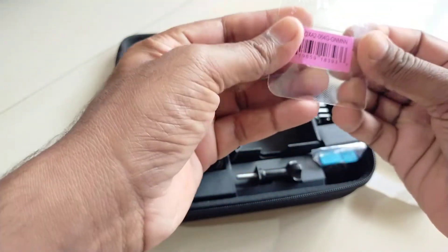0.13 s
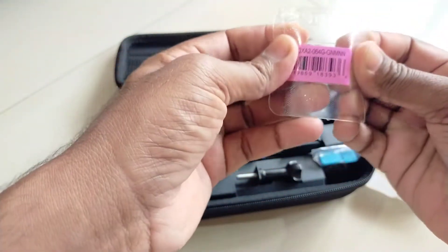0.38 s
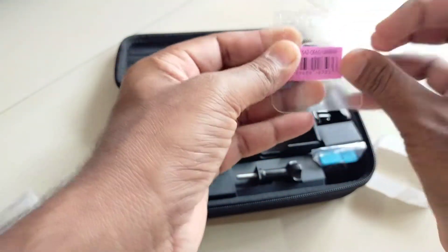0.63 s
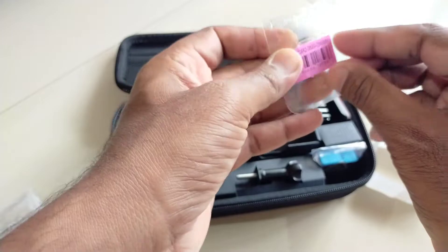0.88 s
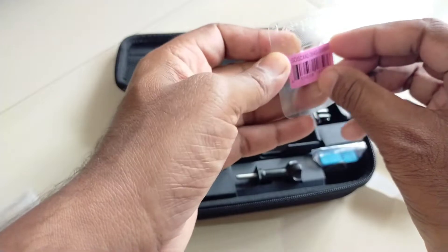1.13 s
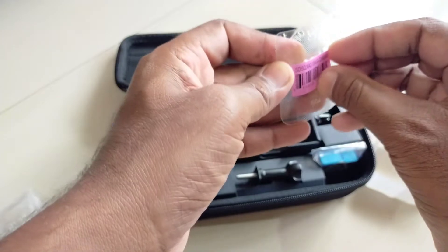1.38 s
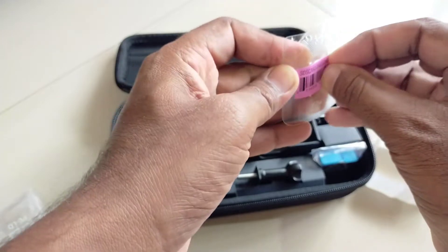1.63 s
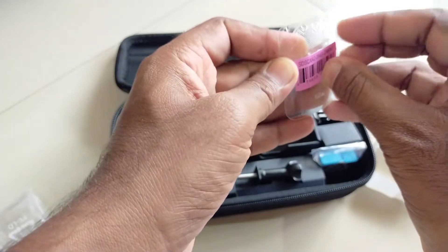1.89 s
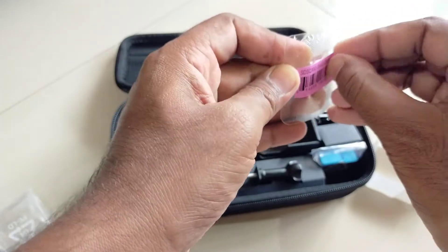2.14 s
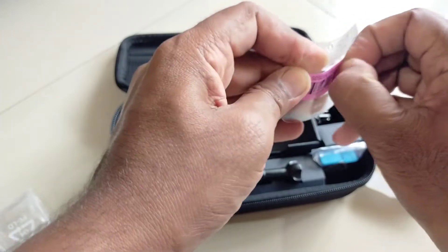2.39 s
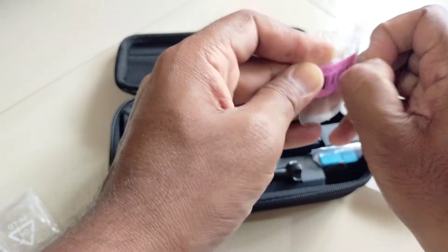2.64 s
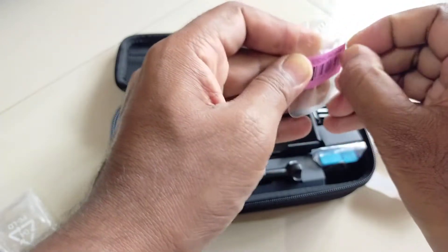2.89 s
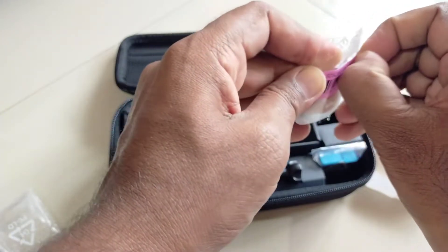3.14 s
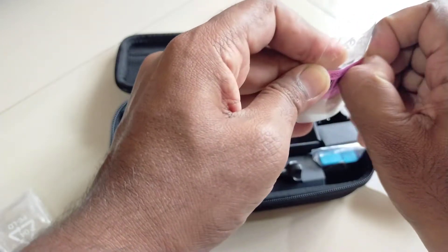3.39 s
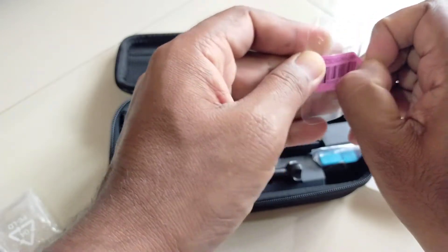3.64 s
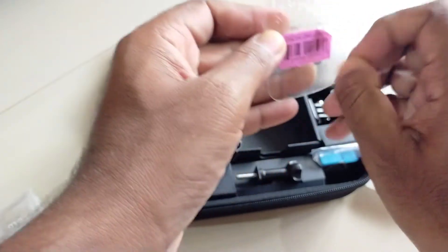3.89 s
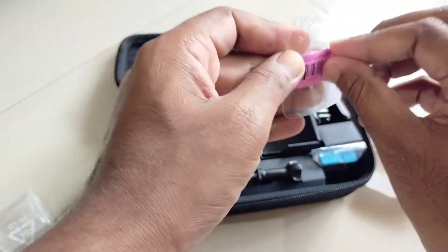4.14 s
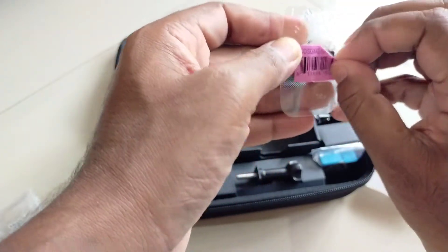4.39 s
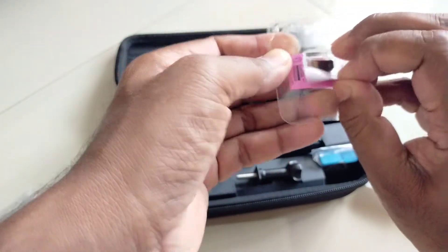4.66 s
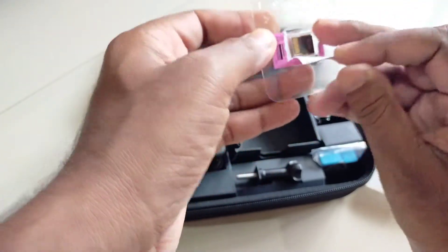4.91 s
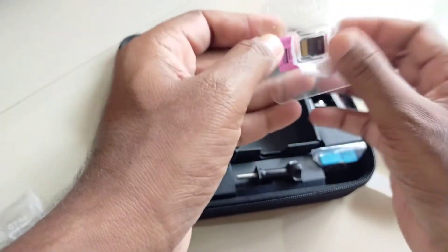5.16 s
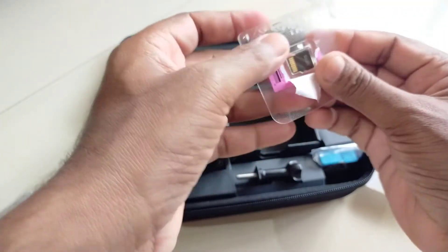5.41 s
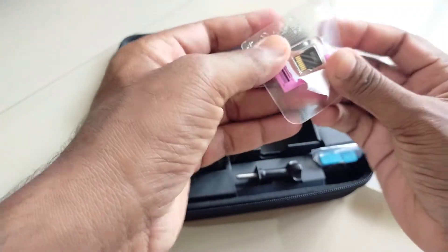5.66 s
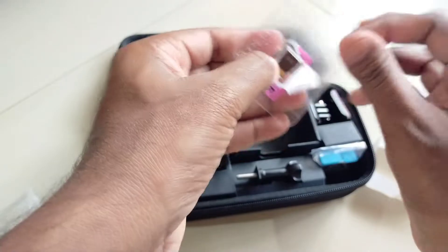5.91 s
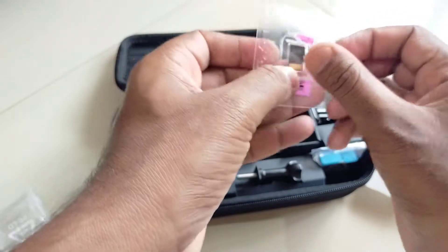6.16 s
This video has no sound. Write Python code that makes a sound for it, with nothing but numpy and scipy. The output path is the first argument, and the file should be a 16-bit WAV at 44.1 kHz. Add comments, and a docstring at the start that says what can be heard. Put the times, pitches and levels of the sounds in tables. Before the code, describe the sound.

Very close to a phone microphone in a small room, stiff plastic film is handled and a glued label picked off. Sparse faint snaps come first, then a crackling cluster, then loud bright peeling snaps with low bumps on the microphone, finally loose small crinkles. Distant furniture booms and scrapes early on, over a quiet hush.

```python
"""In a small room, a hand's width from a phone, fingers pick a sticky label off a stiff plastic packet in jerks.
Film snaps are sharp fronts with noise chatter and patter; rustle is uneven noise in tilted octaves.
Sparse noise ticks come from the held film, and a short noise tail is the room's answer.
Further off, dragged furniture booms as a wavering low tone and scrapes and squeaks as resonant noise.
Shaped noise makes the steady hush, and knocks shift the microphone's resting point."""
import sys
import numpy as np
from scipy import signal
from scipy.fft import rfft, irfft
from scipy.io import wavfile
from scipy.ndimage import uniform_filter1d

SR = 44100
rng = np.random.default_rng(int(sys.argv[2]) if len(sys.argv) > 2 else 0)


def volts(x):
    """Linear amplitude factor 10**(x/20) for a level x in dB, scalar or array-like."""
    e = np.asarray(x, float) / 20
    return 10 ** e


def put_to_file(sound):
    """Save the sound as 16-bit audio at rate SR, in the file named by the first command-line argument."""
    columns = np.atleast_2d(sound).T  # one column per channel
    safe = np.clip(columns, -1, 1)
    whole_steps = np.round(safe * 32767)
    wavfile.write(sys.argv[1], SR, whole_steps.astype(np.int16))


N = 277389  # length in samples


def band(x, lo_hz, hi_hz):
    """Band-pass along the last axis."""
    sos = signal.butter(2, [lo_hz, min(hi_hz, 19000)], "band", fs=SR, output="sos")
    return signal.sosfilt(sos, x)


def ring(x, hz, width_hz):
    """One resonance, gain 1 at its centre."""
    b, a = signal.iirpeak(hz, hz / width_hz, fs=SR)
    return signal.lfilter(b, a, x)


def unit(x):
    """Scale to rms 1."""
    return x / np.sqrt(np.mean(x ** 2))


def walk(rate_hz):
    """Random level that glides to a new value rate_hz times a second; spread near 1."""
    hold = int(SR / rate_hz)
    steps = np.repeat(rng.standard_normal(N // hold + 1), hold)
    return uniform_filter1d(steps, hold)[:N]


def swell(start_s, length_ms, rise_ms, fall_ms):
    """Level of one gesture: a straight rise, then an exponential fall from length_ms onward."""
    ms = (np.arange(N) / SR - start_s) * 1000
    rise = np.clip(ms / rise_ms, 0, 1)
    return rise * np.exp(-np.maximum(ms - length_ms, 0) / fall_ms)


# Film snaps: start_s, peak_db, low_db (below 2.5 kHz), high_db (above 7 kHz);
# low_db and high_db are gains against the middle band
FILM_SNAPS = [(0.2079, -33, -0.5, -11), (0.2765, -51, 6, -23), (0.5448, -47, -23, 2), (0.7798, -37.5, 4, 2),
              (1.502, -24, 4.5, -16), (1.6184, -46, 3, -5), (1.6436, -36, 6, -7), (1.709, -43.5, -9, 2),
              (1.8022, -18, -27, -15.5), (2.083, -39.5, -14, -11), (2.1168, -41.5, -18, 7.5),
              (2.6376, -49, 10, 4), (2.7126, -45.5, -4, -31), (2.887, -46.5, 18, -4),
              (3.5323, -44, -25, 1.5), (3.555, -29, -16, -1.5), (3.5696, -20.5, 14.5, 11.5),
              (3.5893, -24, -2, -4), (3.6132, -41.5, -12, 1), (3.677, -18, -9.5, 5),
              (3.6973, -31, -17, -0.5), (3.704, -20, -5.5, 3.5), (3.758, -18.5, -4.5, 2),
              (3.7915, -17, -7, 5.5), (3.8451, -27.5, -5.5, -16), (3.8516, -18.5, -13, -30),
              (4.0452, -32, 3, -14), (4.0969, -41.5, 2, -38.5), (4.16, -42.5, -2.5, -31),
              (4.191, -50.5, -3.5, -20), (4.2489, -36.5, -24, -5), (4.2976, -17.5, -4.5, 12.5),
              (4.317, -12.5, -3.5, 18), (4.336, -22, -2, 2.5), (4.3542, -18.5, 3.5, 9.5),
              (4.372, -13.5, 16.5, 16.5), (4.4022, -13.5, 12, 2), (4.421, -18, 11.5, 8.5),
              (4.4526, -17, -5, -4), (4.5333, -11, -4, -8.5), (4.6104, -13, 15, 4.5),
              (4.644, -11, -0.5, -2), (4.7006, -10, 17, 10.5), (4.7308, -20.5, 23.5, -7),
              (4.7437, -23.5, -17, 12), (4.7483, -10.5, 5, 10), (4.7572, -19.5, 12.5, -0.5),
              (4.7632, -20.5, -2, 8), (4.9746, -29.5, 0, 11), (5.015, -8.5, 16, 6),
              (5.0288, -22.5, 7.5, -4), (5.1726, -31, 4, -11), (5.1995, -30, -4, -12),
              (5.2121, -30, -5, -25), (5.2459, -25, -9.5, -44), (5.4287, -35.5, 6, -17),
              (5.508, -30, -7, 12.5), (5.7477, -39, 2, 10), (5.7715, -33, -3, 28), (5.856, -25.5, -2, -7),
              (5.894, -38.5, -5, -22), (6.1479, -41, 2.5, -30), (6.1632, -41, 1, -16)]


def snaps():
    """The glue gives, a crease flips: a sharp front, brief chatter, and a patter of smaller creases."""
    size, lead = 4096, 220  # samples per snap, samples ahead of its front
    patter_t60_s = .05
    out = np.zeros(N + size)
    t = (np.arange(size) - lead) / SR
    # the patter builds up for a few ms before the flip and dies away after it
    patter_shape = np.where(t < 0, np.exp(t / .002), volts(-60 * t / patter_t60_s))
    chatter_shape = (t > 0) * np.exp(-np.abs(t) / .0006)
    for start_s, peak_db, low_db, high_db in FILM_SNAPS:
        chatter, grain = rng.standard_normal((2, size))
        # patter closes in on weaker snaps; bright glue snaps are cleaner
        patter_db = -25.5 - 0.2032 * peak_db - 0.32 * high_db
        patter = volts(patter_db + 5.5 * grain) * patter_shape
        push = chatter * (chatter_shape + patter)
        push[lead] = -2.6  # the front sucks air in first
        low = volts(low_db) * band(push, 220, 2500)
        middle = band(push, 2500, 7000)
        high = volts(high_db) * band(push, 7000, 18000)
        snap = low - middle + high
        at = int((start_s + .0005) * SR) - lead  # front 0.5 ms after start_s
        out[at:at + size] += volts(peak_db) * snap / np.max(np.abs(snap))
    return out[:N]


# Film bending or peeling smoothly: start_s, size_ms (scales hold and fall), level_db,
# brightness_db_per_octave
FILM_RUSTLES = [(.30, 13, -66.5, -5), (0.593, 31, -62.5, -5), (1.13, 97, -79, -5.5), (1.796, 55, -58.5, 0),
                (2.08, 97, -70, -2.5), (3.152, 28, -71.5, -8), (3.59, 41, -81, 21), (3.857, 56, -47, -3.5),
                (4.041, 45, -57, -6.5), (4.461, 220, -52, 2), (4.606, 7.6, -38.5, 5.5),
                (4.83, 52, -45.5, -0.5), (5.19, 102, -63.5, -4.5), (5.442, 14.5, -48, -4.5),
                (5.747, 48, -63.5, -0.5), (5.878, 54, -65, -6), (6.04, 10.4, -57.5, -6.5),
                (6.144, 140, -69, -5), (6.28, 3.5, -49, -3.5)]


def rustle():
    """Countless tiny creases of very unequal size; stiffer bending is brighter."""
    crease_db = 2.6 * rng.exponential(size=N) + 3.5 * walk(150)
    creases = unit(rng.standard_normal(N) * volts(crease_db))
    # five octaves up from 700 Hz, neighbours in opposite polarity
    octaves = [(-1) ** k * band(creases, 700 * 2 ** k, 1400 * 2 ** k) for k in range(5)]
    octaves[0] *= volts(-5)
    out = np.zeros(N)
    for start_s, size_ms, level_db, brightness_db in FILM_RUSTLES:
        film = sum(volts(brightness_db * (k - 2.5)) * x for k, x in enumerate(octaves))
        out += volts(level_db) * swell(start_s, 0.4 * size_ms, 6.2, 0.94 * size_ms) * film
    return out


def ticks():
    """The held film ticks faintly by itself, at random, about nine times a second."""
    when = rng.random(N) < 9 / SR
    strengths = when * volts(4.9 * rng.standard_normal(N))
    tick = rng.standard_normal(256) * np.exp(-np.arange(256) / 40)  # fall in samples
    return volts(-64) * band(signal.fftconvolve(strengths, tick)[:N], 2500, 12000)


def room(x):
    """The walls answer with a short noise tail that leaves out the bass."""
    t60_s, tail_db = .5, -15
    t = np.arange(SR // 2) / SR
    noise = band(rng.standard_normal(len(t)), 1400, 14300)
    walls = noise * volts(-60 * t / t60_s) * (t > .005)  # first answer after 5 ms
    walls /= np.linalg.norm(walls)
    return x + volts(tail_db) * signal.fftconvolve(x, walls)[:N]


def resonate(noise, modes):
    """A dragged part sounds through its modes, each resonance applied twice; rms 1."""
    return unit(sum(volts(level_db) * ring(ring(noise, pitch_hz, width_hz), pitch_hz, width_hz)
                    for pitch_hz, width_hz, level_db in modes))


# Dull resonances of the scrape: pitch_hz, width_hz (of a single pass), level_db (relative)
SCRAPE_MODES = [(350, 810, 5), (640, 71, -2.5), (1145, 63, -3)]
# Resonances of the squeak: pitch_hz, width_hz (of a single pass), level_db (relative)
SQUEAK_MODES = [(2350, 600, 0), (3750, 300, -10)]
# Dragging heard through floor and walls: start_s, size_ms (hold of the boom, scales the scrape and squeak),
# boom_db, scrape_db, squeak_db
DRAGS = [(-.1, 140, -48, -63.5, -110), (1.333, 216, -54.5, -60, -73), (1.596, 262, -48, -53.5, -66.5),
         (2.344, 250, -85, -62, -68), (5.351, 350, -56.5, -72.5, -108.5)]


def drag():
    """The floor booms near one pitch while the dragged legs judder through dull resonances and squeak."""
    pitch_hz = 70 + 5.7 * walk(15)
    tone = volts(0.4 * walk(1.6)) * np.sin(2 * np.pi * np.cumsum(pitch_hz) / SR)
    rumble = unit(band(rng.standard_normal(N), 6.5, 110))
    boom = tone + 0.6 * rumble
    judder = rng.standard_normal((2, N)) * volts(1.5 * walk(60))
    scrape = resonate(judder[0], SCRAPE_MODES)
    squeak = resonate(judder[1], SQUEAK_MODES)
    out = np.zeros(N)
    for start_s, size_ms, boom_db, scrape_db, squeak_db in DRAGS:
        out += volts(boom_db) * swell(start_s, size_ms, 32, 220) * boom
        legs = volts(scrape_db) * scrape + volts(squeak_db) * squeak
        out += swell(start_s, 0.46 * size_ms, 0.21 * size_ms, 0.7 * size_ms) * legs
    return out


# Tone colour of the hush: pitch_hz, level_db (per Hz, relative)
HUSH_SPECTRUM = [(19, -92.5), (32, 4), (45, 1.5), (98, -2), (420, -21), (1190, -22), (2220, -24.5),
                 (4840, -38.5), (13000, -43.5), (14800, -37), (16000, -45.5)]


def air():
    """Hush of the house and the microphone's own hiss: shaped noise whose level wavers slightly."""
    hz, db = np.transpose(HUSH_SPECTRUM)
    f = np.fft.rfftfreq(N, 1 / SR) + 1  # 1 Hz up, to keep the logarithm finite
    colour = volts(np.interp(np.log(f), np.log(hz), db))
    hush = unit(irfft(rfft(rng.standard_normal(N)) * colour, N))
    return volts(-64.5 + walk(5.79)) * hush


def scene():
    """The film sounds in the room, the dragging and the hush reach one microphone, alike on both channels."""
    film = room(snaps() + rustle() + ticks())
    return np.tile(film + drag() + air(), (2, 1))


# Knocks to the resting point of the microphone: start_s, jump_share (of full scale, signed)
REST_KNOCKS = [(4.421, .052), (4.453, -.028), (4.533, .012), (4.596, -.03), (4.602, .022), (4.611, .03),
               (4.701, .072), (4.731, -.028), (4.743, -.025), (4.749, -.02), (4.757, -.025), (4.764, -.045),
               (5.008, -.022)]


def rest():
    """Each knock makes the resting point jump and spring back; the label coming free heaves it once, slowly."""
    jump_ms, rebound_ms = 1.5, 35
    knocks = sum(jump_share * swell(start_s, jump_ms, jump_ms, rebound_ms)
                 for start_s, jump_share in REST_KNOCKS)
    heave = .095 * swell(4.835, 70, 50, 260)  # share of full scale; start s, hold, rise and fall ms
    return knocks + heave


# Resonances of the microphone opening: pitch_hz, width_hz, lift_db
OPENING_MODES = [(7900, 1000, 4), (15400, 1600, 8)]


def opening(x):
    """The small opening of the microphone resonates and lifts two treble bands."""
    return x + sum((volts(lift_db) - 1) * ring(x, pitch_hz, width_hz)
                   for pitch_hz, width_hz, lift_db in OPENING_MODES)


def side_treble(x, top_hz):
    """Now and then some roughened treble spreads a little to the sides, opposite in the two channels."""
    rough = band(x, 6700, top_hz) * walk(3000)
    spread = band(rough, 4500, top_hz) * (walk(45) > .5)
    return volts(-6.5) * np.array([spread, -spread])


def top_cut(x):
    """Nothing passes above the cut-off."""
    return signal.sosfilt(signal.butter(12, 17130, fs=SR, output="sos"), x)


def record(dry):
    """The opening colours the sound, the top is cut, and side treble and the shifting resting point add in."""
    top_hz = 15800
    # 30 dB down from 500 Hz above the top
    x = signal.sosfilt(signal.cheby2(10, 30, top_hz + 500, fs=SR, output="sos"), opening(dry))
    mix = x + side_treble(x[0], top_hz) + rest()
    return top_cut(mix)


dry = scene()
out = record(dry)
put_to_file(out)
```